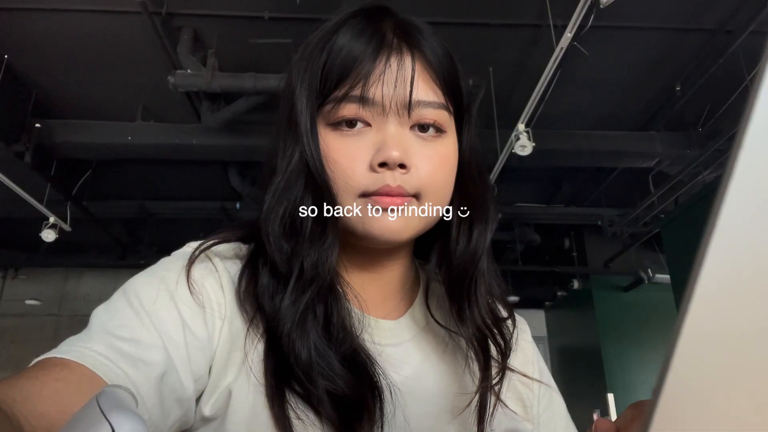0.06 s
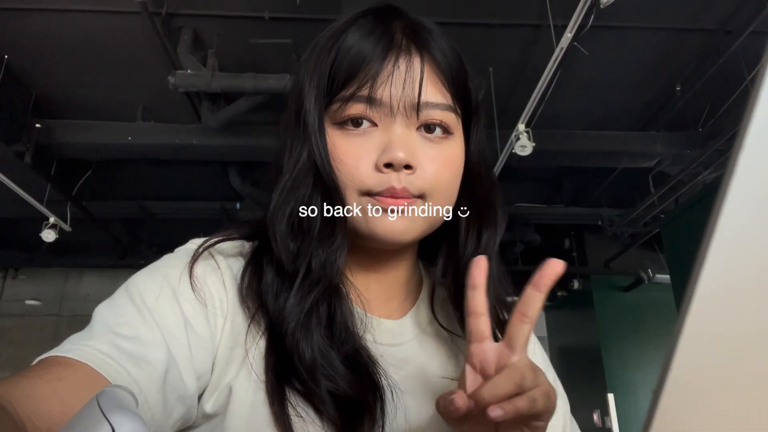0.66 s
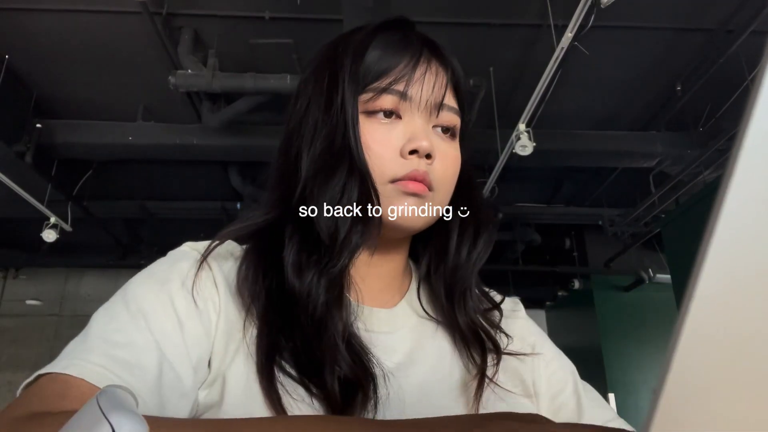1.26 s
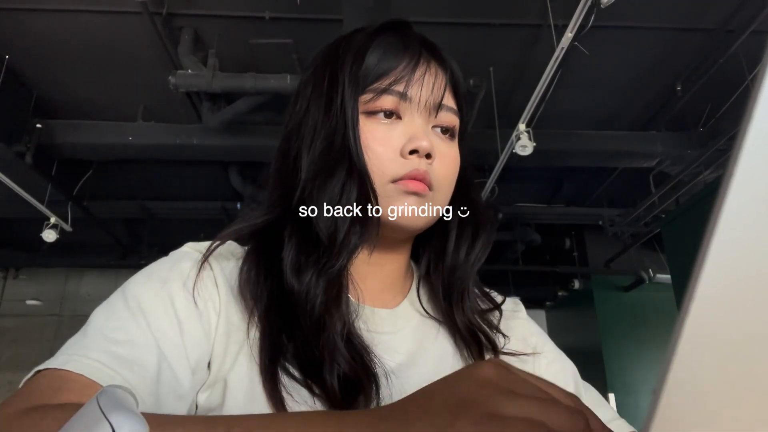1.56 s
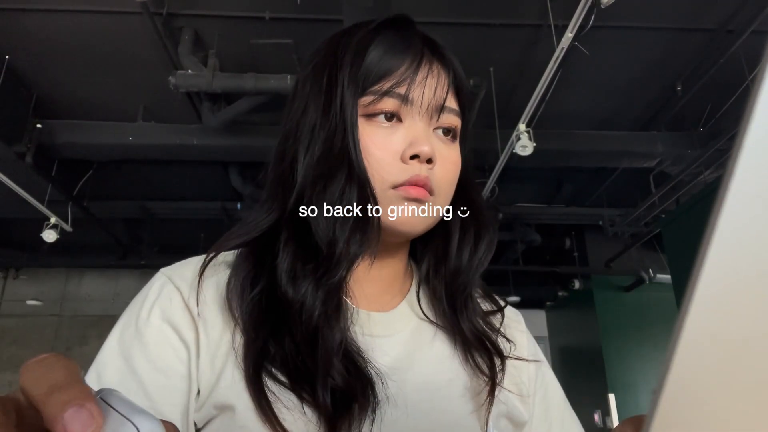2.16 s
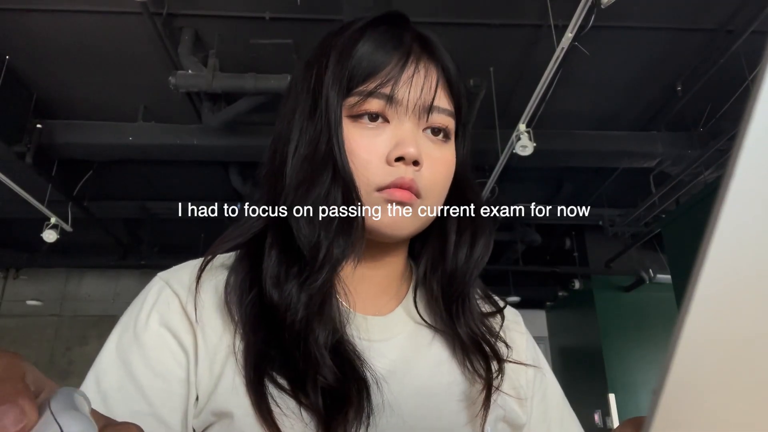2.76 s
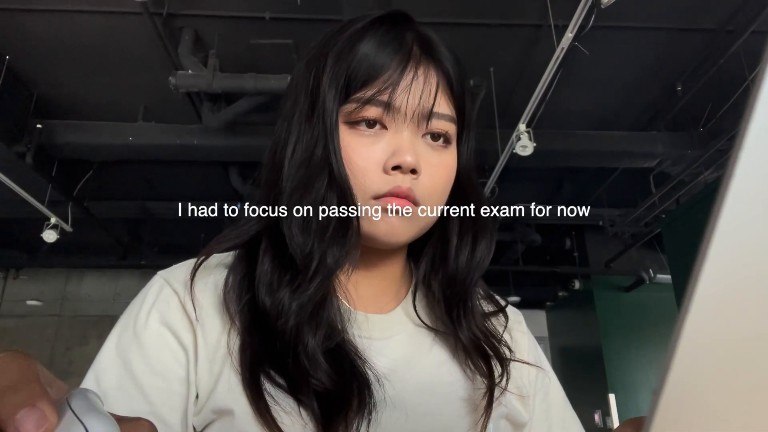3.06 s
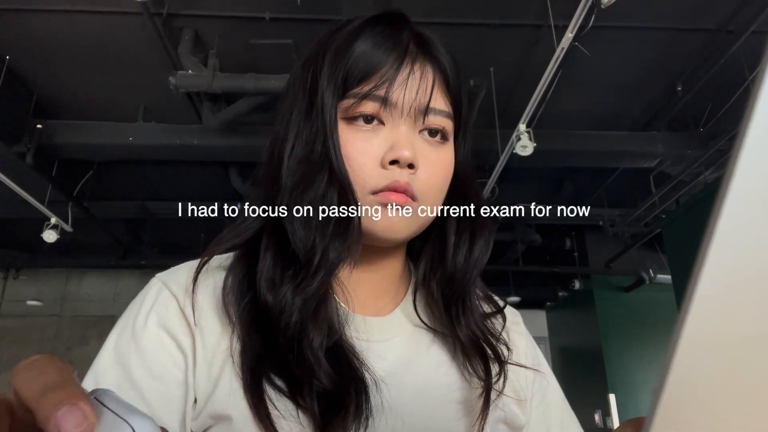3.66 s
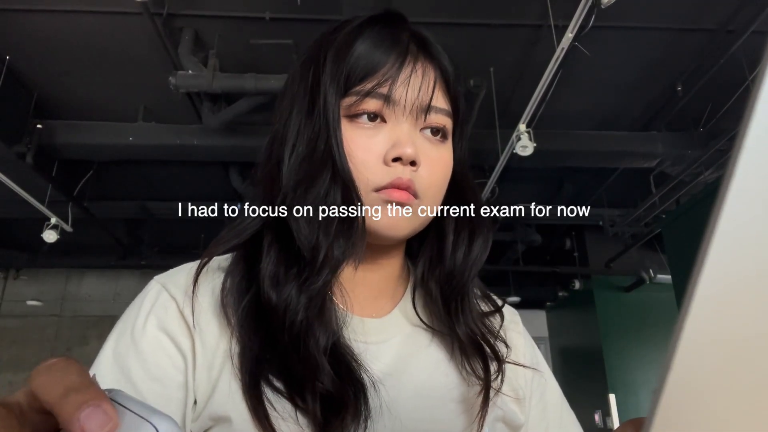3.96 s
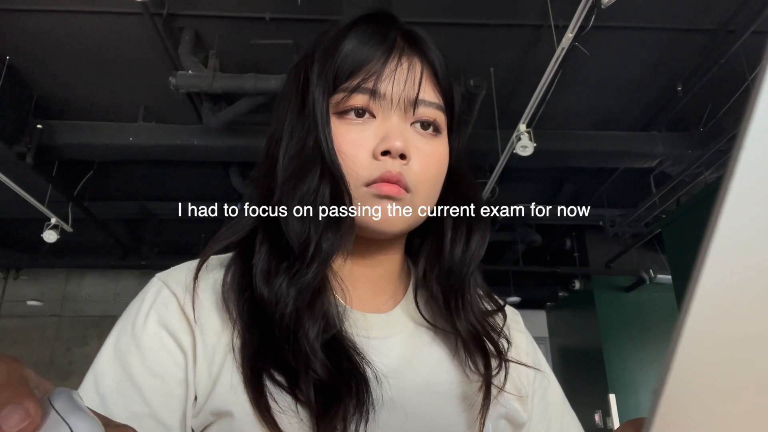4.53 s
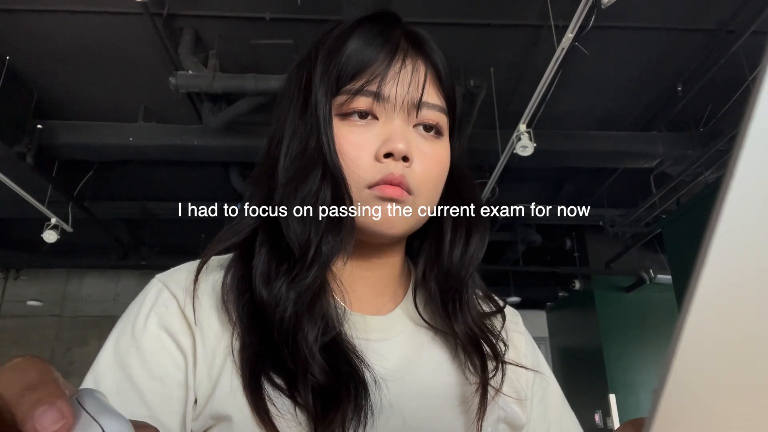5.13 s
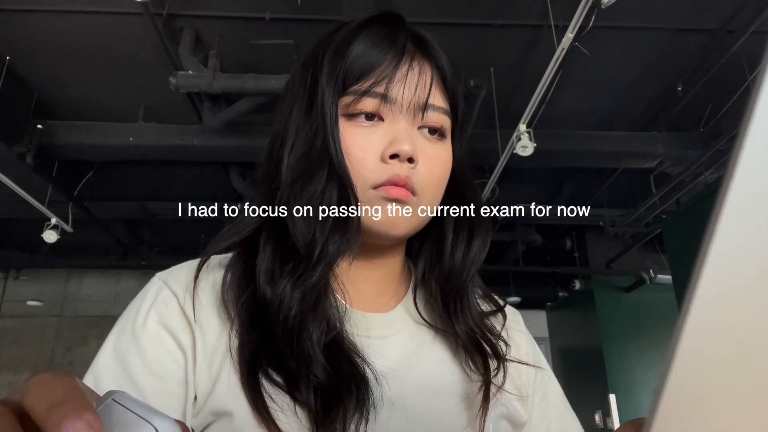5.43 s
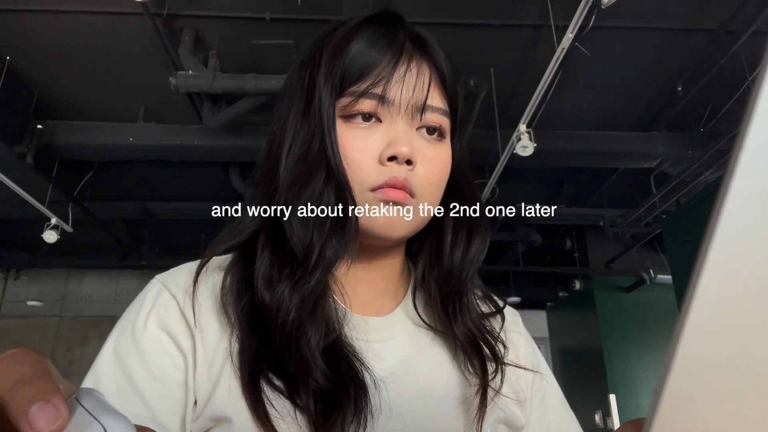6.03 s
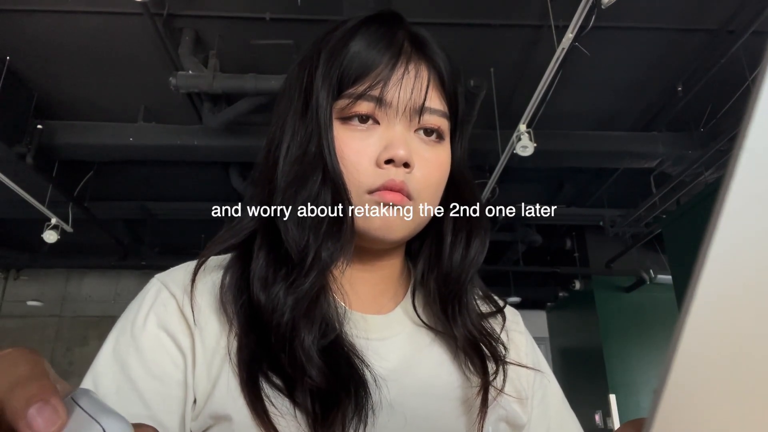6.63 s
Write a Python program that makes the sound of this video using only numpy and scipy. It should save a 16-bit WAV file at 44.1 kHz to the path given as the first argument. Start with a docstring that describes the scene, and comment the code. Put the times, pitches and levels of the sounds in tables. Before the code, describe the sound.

Ventilation machinery drones in a large hall from start to finish, about seven seconds: a throbbing low hum, a steadier note above it, rushing air, wavering duct resonances and a very faint, thin fan whine. At about 0.9 seconds, close to the microphone, an arm softly bumps and brushes a desk, with a tiny fingernail tick. At about 1.8 seconds a hand knocks a plastic computer mouse, a short clack with a thud from the desk, the sharpest sound here. The mouse scrapes and catches in short strokes until about 2 seconds. Much fainter slides come near 2.5, 3.2, 4.3 and 4.6 seconds, and another with a slight tick at 5. Soft duct tones swell briefly around 3.4, 4.5, 4.9 and 6.7 seconds. The desk sounds leave only a slight, dull echo.

```python
"""Desk under hall ventilation

Ventilation machinery drones in a large hall with open ducts: a throbbing low note, its steadier
octave, rushing air, duct resonances driven by turbulence and a thin fan whine. Close by, an arm
bumps and brushes the desk, then a hand knocks a computer mouse and slides it in short strokes.
Impacts and friction ring the plastic shell and the desk top."""
import sys
import numpy as np
from scipy import signal
from scipy.fft import rfft, irfft, next_fast_len
from scipy.io import wavfile

SR = 44100
rng = np.random.default_rng(int(sys.argv[2]) if len(sys.argv) > 2 else 0)


def generate_wav(sig):
    """Save sig (samples, or channels by samples) to the path in sys.argv[1] as 16-bit PCM at SR."""
    pcm = np.round(np.clip(np.atleast_2d(sig).T, -1, 1) * 32767).astype(np.int16)
    wavfile.write(sys.argv[1], SR, pcm)


N = 299439
TIME = np.arange(N) / SR


def from_db(db):
    """Decibels to gain."""
    return 10 ** (np.asarray(db) / 20)


def unit_rms(x):
    """Scale to rms 1."""
    return x / np.sqrt(np.mean(np.abs(x) ** 2) + 1e-20)


def curve(points):
    """Breakpoints interpolated at every sample."""
    return np.interp(TIME, *np.transpose(points))


def stereo(mid, side):
    """Mid/side to left/right."""
    return np.array([mid + side, mid - side])


def band(x, low_hz, high_hz):
    """Zero-phase band-pass."""
    sos = signal.butter(2, [low_hz, high_hz], "band", fs=SR, output="sos")
    return signal.sosfiltfilt(sos, x, padtype="even", padlen=SR // 4)


def colour(x, spectrum):
    """Filter by (frequency [Hz], gain [dB]) points; 48 dB/octave roll-off outside them."""
    size = next_fast_len(N)
    octave = np.log2(np.maximum(np.fft.rfftfreq(size, 1 / SR), 1))
    hz, db = np.transpose(spectrum)
    beyond = np.abs(octave - np.clip(octave, np.log2(hz[0]), np.log2(hz[-1])))
    gain = from_db(np.interp(octave, np.log2(hz), db) - 48 * beyond)
    return irfft(rfft(x, size) * gain, size)[:N]


def noise(spectrum):
    """Coloured noise, rms 1."""
    return unit_rms(colour(rng.standard_normal(N), spectrum))


def wander(width_hz, skirt_hz):
    """Complex amplitude of a noise-driven resonance, rms 1."""
    size, step = 8192, 40
    hz = np.fft.fftfreq(size, step / SR)
    peak = 1 / (1 + 2j * hz / width_hz) / (1 + (hz / skirt_hz) ** 2)
    drive = rng.standard_normal(size) + 1j * rng.standard_normal(size)
    slow = np.fft.ifft(peak * np.fft.fft(drive))
    return unit_rms(np.interp(np.arange(N) / step, np.arange(size), slow))


def flicker(depth_db, width_hz, skirt_hz):
    """Random gain about 0 dB, deviation about 0.7 * depth_db."""
    return from_db(depth_db * np.real(wander(width_hz, skirt_hz)))


def saturate(swing, knee):
    """Level off amplitude above the knee; rms 1."""
    return unit_rms(swing / np.sqrt(np.abs(swing) ** 2 + knee ** 2))


def tone(amplitude, hz, phase_rad, pan_db=0):
    """Standing wave with a left-right difference in phase and level."""
    wave = np.sqrt(2) * amplitude * np.exp(2j * np.pi * hz * TIME)
    sides = np.array([[0.5], [-0.5]])
    return np.real(wave * from_db(pan_db * sides) * np.exp(1j * phase_rad * sides))


def bursts(rows):
    """Envelope of sudden, decaying contacts."""
    return sum(from_db(db - 60 * np.clip((TIME - s) / t60, 0, 4)) * (TIME >= s) for s, db, t60 in rows)


def strokes(rows):
    """Envelope of Gaussian swells, each centred on its time."""
    return sum(from_db(db) * np.exp(-np.minimum((2 * (TIME - s) / length_s) ** 2, 50))
               for s, length_s, db in rows)


# Side gain of desk noise: (frequency [Hz], gain [dB])
DESK_WIDTH = [(150, -5), (700, -2), (1200, -9), (2400, -4.5), (4000, -2), (6500, 9), (8500, 2),
              (11500, -10.5), (16000, -10.5)]

def near_noise(spectrum):
    """Stereo desk noise: central in the midrange, wide in the treble."""
    return stereo(noise(spectrum), colour(noise(spectrum), DESK_WIDTH))


# Strength of the drone's octave: (time [s], relative level [dB])
OCTAVE_LEVEL = [(0, -29.5), (.28, -35), (.45, -30), (.7, -31.5), (1.3, -30), (1.66, -31), (1.8, -31),
                (2.25, -30.5), (2.4, -37), (2.55, -31), (2.85, -32), (3.1, -30), (3.92, -29.5),
                (4.2, -32.5), (4.4, -29.5), (4.8, -30.5), (5.25, -32), (5.65, -28.5), (5.87, -30.5),
                (6.2, -31), (6.4, -29.5), (6.79, -29.5)]

def machinery(throb_hz=5.37, crest_s=0.095, low_hz=58.82, octave_hz=113.94):
    """A low note throbs and strays in pitch; its rough octave is steady when strong, flutters when weak."""
    throb = np.cos(2 * np.pi * throb_hz * (TIME - crest_s))
    low_gain = from_db(-30.5 + 3 * throb) * flicker(depth_db=1.3, width_hz=7.3, skirt_hz=19)
    low = low_gain * saturate(wander(width_hz=8.3, skirt_hz=17), knee=0.63)
    octave_db = curve(OCTAVE_LEVEL)
    hold = 1.1 * from_db(5.6 * (octave_db - np.mean(octave_db)))
    octave_gain = from_db(octave_db - 0.45 - throb)   # yields 1 dB at each crest
    octave = octave_gain * saturate(hold + wander(width_hz=9.6, skirt_hz=28.5), knee=0.65)
    return (band(tone(low, low_hz, phase_rad=0.87, pan_db=2.5), 42, 86)
            + band(tone(octave, octave_hz, phase_rad=0.58, pan_db=-3.5), 90, 167))


# Air mid, air side and duct rumble spectra: (frequency [Hz], relative density [dB])
AIR_MID = [(150, -6.5), (220, -6), (350, -5), (530, -12), (720, -15), (850, -19.5), (1200, -27.5),
           (2300, -40), (3400, -44), (4800, -46), (6300, -52), (7600, -63), (8900, -51), (11000, -53.5),
           (13500, -67.5)]
AIR_SIDE = [(150, -8.5), (270, -2), (400, 0), (530, -4), (780, -4.5), (960, -13), (1100, -16),
            (1560, -19.5), (2300, -33.5), (4700, -36), (7500, -45.5), (8900, -41), (11000, -51),
            (12000, -71)]
RUMBLE = [(20, -17), (27, -8.5), (34, -2.5), (55, -2), (90, -1.5), (130, 0.5), (165, -12), (200, -22)]

def airflow():
    """Air rushes and rumbles in the ducts; the low rush surges with the flow."""
    rush = stereo(from_db(-46) * noise(AIR_MID), from_db(-48) * noise(AIR_SIDE))
    surge = from_db(-0.04) * flicker(depth_db=2.5, width_hz=6.3, skirt_hz=11)
    return rush + band(rush, 190, 520) * (surge - 1) + from_db(-41.5) * noise(RUMBLE)


# Duct and fan modes: (frequency [Hz], width [Hz], level [dB], left-right phase [rad])
DUCT_MODES = [(213.1, 14, -54, 0.1), (233.8, 18, -50.5, -0.8), (338.8, 34, -56.5, 0.5),
              (400.6, 33, -60, 0.7), (470, 30, -61.5, 1.2), (586, 19, -55.5, 1.78), (675, 12, -60, 1.5),
              (715.6, 22, -61.5, 1.0), (746, 12, -59, 3), (956, 48, -62.5, 1.8), (1277, 70, -72.5, 2),
              (1354, 26, -69, 2.0), (1474, 12, -74, 2.5), (2006, 99, -78.5, 1), (2784, 110, -87, 1.4),
              (3730, 37, -87.5, -1.5), (4590, 160, -88.5, 1), (8900, 380, -88.5, 2),
              (10800, 480, -87.5, -0.5)]

def duct_resonances():
    """Uneven flow drives each mode now harder, now softer."""
    modes = 0
    for hz, width_hz, db, phase_rad in DUCT_MODES:
        swing = wander(width_hz, 2 * width_hz) * flicker(depth_db=2.5, width_hz=6, skirt_hz=9)
        modes += tone(from_db(db) * unit_rms(swing), hz, phase_rad)
    return modes


# Strength of the whine: (time [s], relative level [dB])
WHINE_LEVEL = [(0, -78), (.14, -72.5), (.38, -78.5), (.49, -71), (.66, -85), (.73, -74), (.9, -76.5),
               (1.02, -82), (1.12, -79), (1.5, -79), (1.61, -75.5), (1.72, -78.5), (2.05, -86),
               (3.3, -83.5), (3.85, -77.5), (4.1, -74.5), (4.2, -79), (4.5, -82.5), (5.64, -86),
               (5.72, -78), (6.45, -80.5), (6.79, -84)]

def fan_whine():
    """A fan gives a thin, wavering tone."""
    waver = saturate(wander(width_hz=21, skirt_hz=38), knee=1.3)
    return tone(from_db(curve(WHINE_LEVEL) + 3) * waver, hz=3530, phase_rad=-1.58, pan_db=-3)


# Desk top modes: (frequency [Hz], gain [dB], t60 [s])
DESK_MODES = [(390, -9, 0.03), (565, -9, .035), (755, -3, 0.022), (985, -4, 0.022)]

def desk_thud(contacts):
    """Contacts strike the heavily damped desk top; mono."""
    thud = 0
    for s, db in contacts:
        age_s = np.clip(TIME - s, 0, 0.2)
        for hz, mode_db, t60_s in DESK_MODES:
            thud += from_db(db + mode_db - 60 * age_s / t60_s) * np.sin(2 * np.pi * hz * age_s)
    return thud


# Modes of the mouse shell on the desk: (frequency [Hz], gain [dB], t60 [s])
SHELL_MODES = [(392, -2.5, 0.049), (570, -5, 0.058), (745, -2, 0.032), (858, -4, 0.054),
               (1720, -7.5, 0.025), (1890, -13, 0.03), (2000, -10.5, 0.041), (2630, -14.5, 0.024),
               (2853, -7, 0.02), (3215, -16, .03), (3790, -17, 0.035), (4700, -19, 0.03),
               (5140, -21.5, 0.03)]

def shell_ring(force):
    """Rough contact pumps the modes of shell and desk, which ring on."""
    rings = 0
    for hz, db, t60_s in SHELL_MODES:
        radius, angle = from_db(-60 / (t60_s * SR)), 2 * np.pi * hz / SR
        drive = force * rng.standard_normal((2, N))
        mid, side = signal.lfilter([1, 0, -1], [1, -2 * radius * np.cos(angle), radius ** 2], drive)
        rings += from_db(db) * stereo(unit_rms(mid), from_db(-5) * unit_rms(side))
    return np.std(force) * rings


# Arm landing: (time [s], relative level [dB])
ARM_BUMPS = [(.9305, -34), (.9405, -35)]
# Arm brushing: (time [s], length [s], relative level [dB])
ARM_BRUSHES = [(.933, 0.012, -40.5), (.941, 0.0071, -43), (.936, 0.048, -50)]
# Brush spectrum: (frequency [Hz], relative density [dB])
BRUSH_SPECTRUM = [(200, 3), (380, 8), (650, 3), (950, 8.5), (1150, -4), (1450, -6.5), (1850, -1),
                  (2150, -16), (2900, -21.5), (7000, -30), (10000, -28.5), (14000, -30.5), (16000, -36)]

def arm_on_desk():
    """A soft arm lands and brushes, waking only the lower modes."""
    force = strokes(ARM_BRUSHES)
    friction = from_db(-3) * force * near_noise(BRUSH_SPECTRUM)
    ring = from_db(-10) * band(shell_ring(force), 330, 2200)
    return desk_thud(ARM_BUMPS) + friction + ring


# Nail contacts: (time [s], relative level [dB], t60 [s])
NAIL_TICKS = [(.9592, -48.5, 0.0045), (5.038, -62, .006)]
# Tick spectrum: (frequency [Hz], relative density [dB])
TICK_SPECTRUM = [(1000, 0.5), (3000, 2.5), (5500, -3.5), (8000, -6.5), (12000, -9), (16000, -11)]

def nail_ticks():
    """A fingernail makes brief, bright contacts."""
    return bursts(NAIL_TICKS) * near_noise(TICK_SPECTRUM)


# Mouse strokes: (time [s], length [s], relative friction [dB], relative ring [dB])
SLIDES = [(1.73, 0.075, -59, -65.5), (1.739, 0.024, -57.5, -54.5), (1.765, 0.04, -50.5, -59.5),
          (1.863, 0.048, -45.5, -54), (1.915, 0.024, -51.5, -49.5), (1.935, .018, -56, -55),
          (1.97, 0.018, -67, -63.5), (2.046, 0.021, -64, -66), (2.491, 0.028, -61.5, -64),
          (3.12, 0.021, -66, -69.5), (3.26, 0.028, -63, -60), (4.27, 0.058, -70, -67.5),
          (4.57, .015, -62, -72), (5.019, 0.084, -68.5, -76)]
# Friction and firm-stroke hiss spectra: (frequency [Hz], relative density [dB])
SLIDE_SPECTRUM = [(500, -7.5), (720, -0.5), (860, 11), (1020, -0.5), (1350, -0.5), (1650, -5), (2150, 2.5),
                  (2450, -4.5), (2750, -3.5), (3100, -8.5), (4300, -9.5), (7000, -28), (11000, -23.5),
                  (15000, -33.5)]
GRIT_SPECTRUM = [(2200, -9), (3500, 3.5), (5300, -1.5), (7200, -12.5), (9000, -9.5), (11500, -9.5),
                 (15000, -19)]

def mouse_slides(ring_hz=2015):
    """The feet stick and slip: grainy friction, brighter when firm, and a narrow ring of the shell."""
    push = strokes([(s, length_s, db) for s, length_s, db, _ in SLIDES])
    grain = flicker(depth_db=3, width_hz=300, skirt_hz=400)
    grit = from_db(-7.5) * (push / push.max()) ** 0.48 * near_noise(GRIT_SPECTRUM)
    friction = from_db(-1.5) * push * grain * (near_noise(SLIDE_SPECTRUM) + grit)
    ring_gain = from_db(-3) * strokes([(s, length_s, db) for s, length_s, _, db in SLIDES])
    waver = saturate(wander(width_hz=180, skirt_hz=260), knee=1.5)
    return friction + ring_gain * tone(waver, ring_hz, phase_rad=0.5)


# Mouse contacts, relative levels: (time [s], crack [dB], rattle t60 [s], shell [dB], thud [dB])
KNOCKS = [(1.777, -25, 0.022, -29, -34), (1.7784, -29, .015, -25, -19), (1.7823, -26, 0.022, -24, -23),
          (1.7851, -28.5, 0.02, -27, -29), (1.7917, -34.5, 0.03, -37, -35.5), (1.7967, -43, 0.02, -43, -44)]
# Plastic crack spectrum: (frequency [Hz], relative density [dB])
CRACK_SPECTRUM = [(200, 4), (500, 9), (850, 12.5), (1020, 13), (1150, -3), (1450, -7), (2000, 1),
                  (2450, -11), (2860, -1), (3200, -3.5), (4200, -10), (5200, -9.5), (6300, -17.5),
                  (8500, -16.5), (11000, -9), (15500, -30)]

def mouse_knock():
    """A hand rocks the mouse: at each contact the plastic cracks, the desk thuds, the shell rings."""
    rattle = bursts([(s, db, t60_s) for s, db, t60_s, _, _ in KNOCKS])
    crack = from_db(-3.5) * rattle * near_noise(CRACK_SPECTRUM)
    force = bursts([(s, db, t60_s) for s, _, t60_s, db, _ in KNOCKS])
    thud = desk_thud([(s, db) for s, *_, db in KNOCKS]) * from_db([[-1], [1]])   # slightly right
    return crack + thud + from_db(-8) * shell_ring(force)


# Foot catches: (time [s], relative force [dB], t60 [s])
CATCHES = [(1.848, -46, .012), (1.858, -42, .012), (1.867, -46, .012), (1.875, -43, .012),
           (1.884, -49.5, .01), (1.909, -45, .012), (1.914, -46, .01)]

def mouse_catches():
    """The feet catch on the desk and jolt the shell."""
    return from_db(-6) * shell_ring(bursts(CATCHES))


# Duct notes: (time [s], length [s], level [dB], frequency [Hz])
SWELLS = [(3.37, .1, -45, 228), (3.44, .08, -56.5, 745), (3.531, .06, -49, 730), (4.5, 0.075, -50, 718),
          (4.523, .09, -46, 232), (4.9, .09, -44, 218), (6.714, .06, -48, 720)]

def duct_swells():
    """Now and then a duct resonance swells into a soft note."""
    waver = saturate(wander(width_hz=9.3, skirt_hz=18), knee=0.3)
    return sum(tone(strokes([(s, length_s, db)]) * waver, hz, phase_rad=1)
               for s, length_s, db, hz in SWELLS)


def hall(x, t60_s, wall_hz):
    """Diffuse, dull tail, different on each side."""
    tail = rng.standard_normal((2, SR)) * from_db(-60 * TIME[:SR] / t60_s)
    tail = signal.sosfilt(signal.butter(1, wall_hz, fs=SR, output="sos"), tail)
    return signal.fftconvolve(x, tail / np.sqrt(np.sum(tail ** 2) / 2), axes=1)[:, :N]


def scene():
    """Near desk sounds and their hall tail over far ventilation."""
    ventilation = machinery() + airflow() + duct_resonances() + fan_whine() + duct_swells()
    desk = arm_on_desk() + nail_ticks() + mouse_slides() + mouse_knock() + mouse_catches()
    return ventilation + desk + from_db(-23.5) * hall(desk, t60_s=0.95, wall_hz=4000)


def record(dry):
    """Steep low-pass at 15.5 kHz."""
    return signal.sosfilt(signal.ellip(10, 0.1, 90, 15500, fs=SR, output="sos"), dry)


dry = scene()
out = record(dry)
generate_wav(out)
```